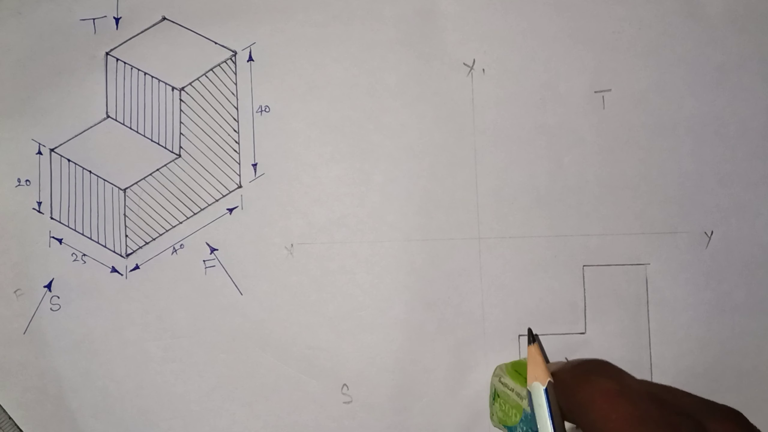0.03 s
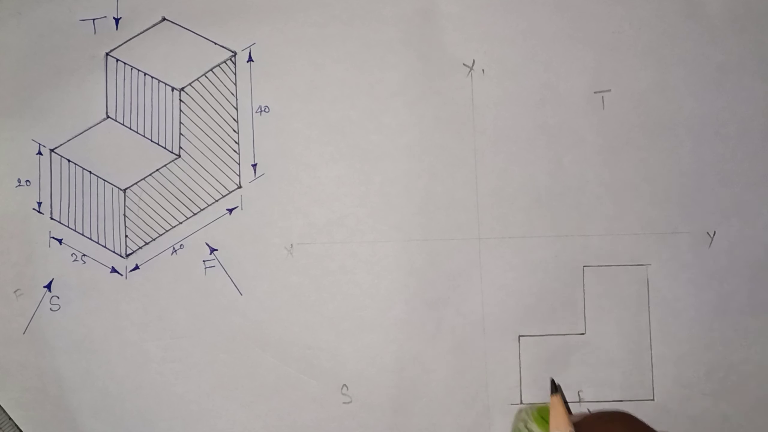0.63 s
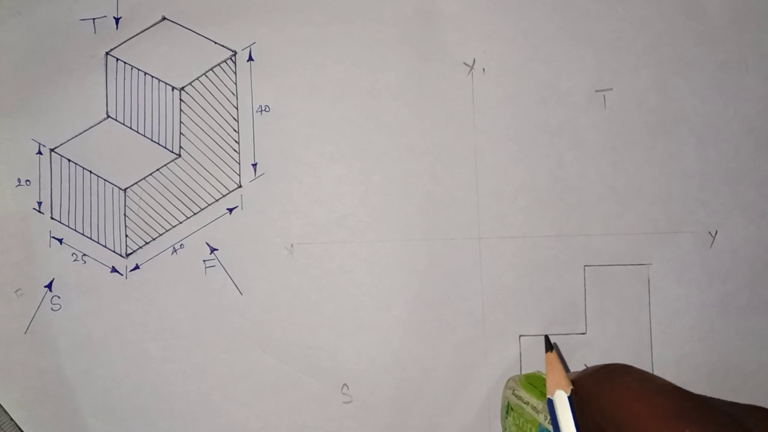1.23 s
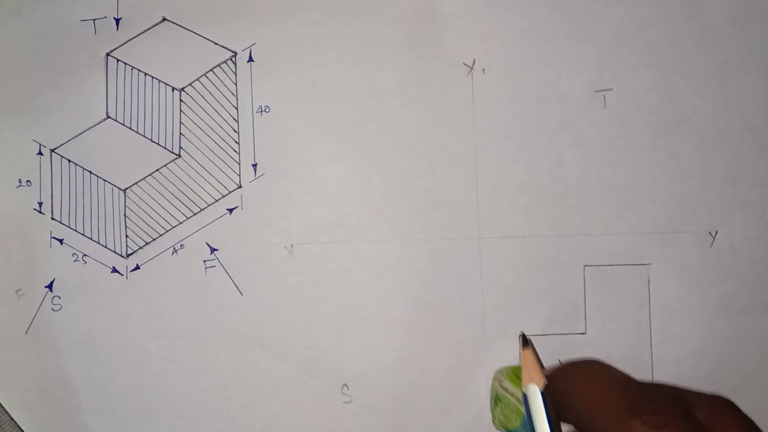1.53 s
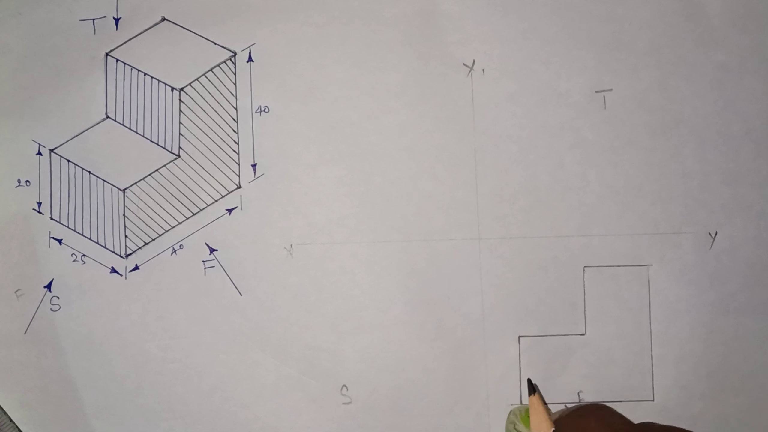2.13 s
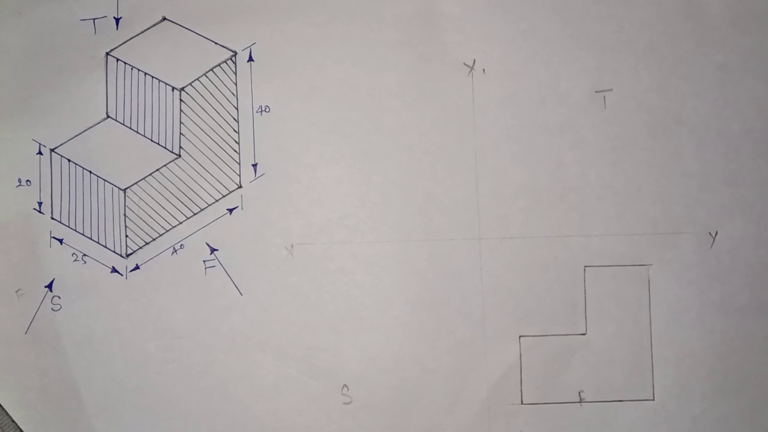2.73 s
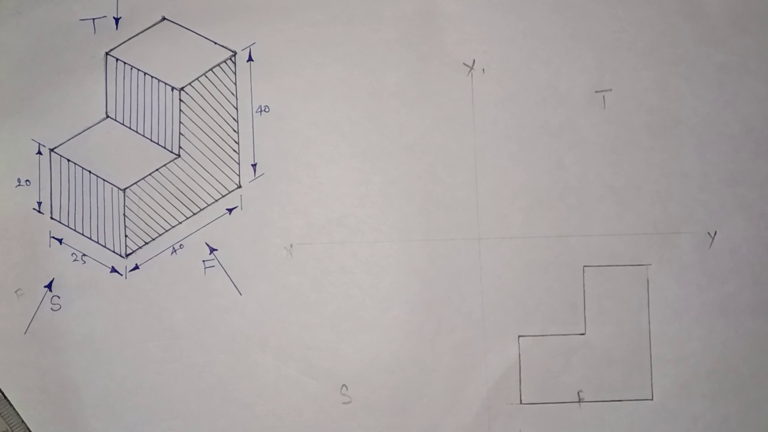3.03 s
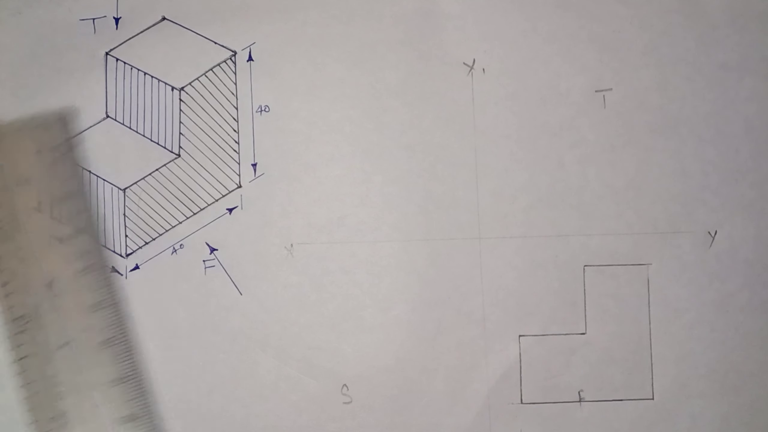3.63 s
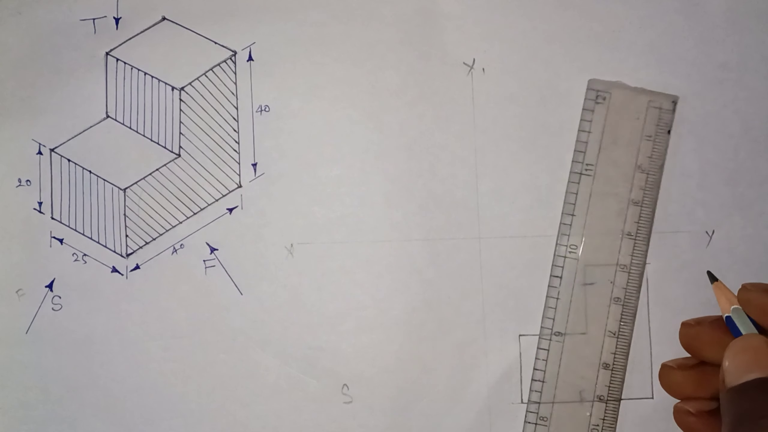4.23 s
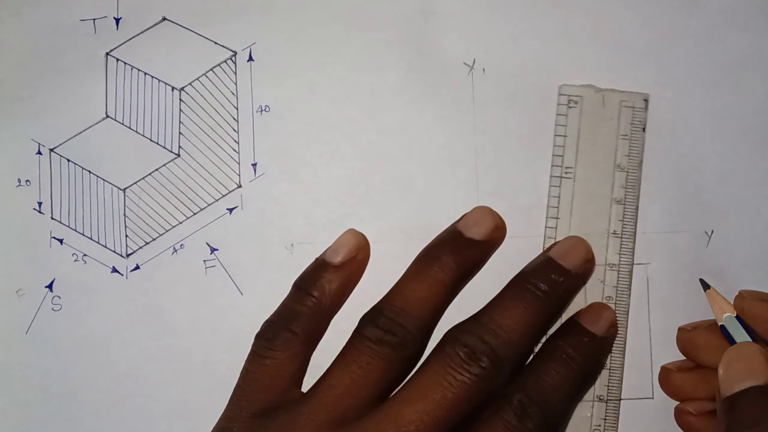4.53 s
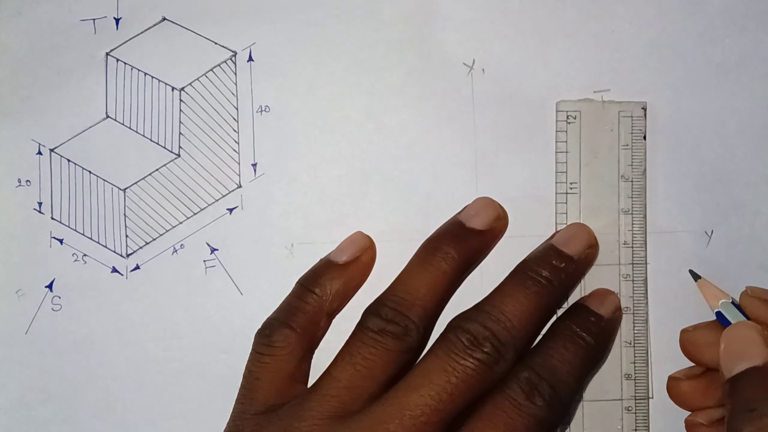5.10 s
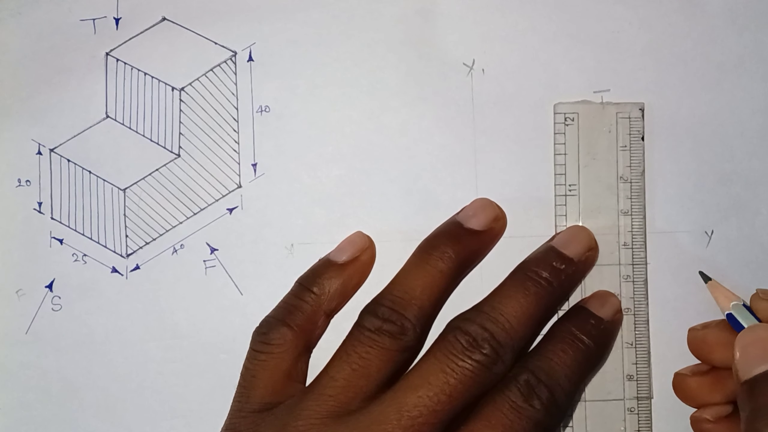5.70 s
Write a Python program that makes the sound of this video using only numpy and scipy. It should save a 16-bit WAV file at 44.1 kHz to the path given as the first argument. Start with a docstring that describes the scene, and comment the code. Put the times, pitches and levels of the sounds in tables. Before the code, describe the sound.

Close to the microphone in a quiet room, faint quick eraser strokes on a paper sheet end in one firm, grainy rub. Scattered taps and dull desk knocks follow as a hand slides and drags across the paper. Then a plastic ruler scrapes briefly and lands in a rattling clatter, the loudest sound, before fingers press it down and shift it with faint, dull rubs.

```python
"""Eraser and ruler on a drawing sheet.

Close up, in a quiet room, a hand holding pencil and eraser wipes lightly to and fro, rubs hard once,
shifts on the paper and taps the desk. A ruler is picked up, dropped flat with a clatter, pressed down
and nudged into place. Rubs are tiny slips on paper fibres; blows ring the modes of ruler and desk."""
import sys
import numpy as np
from scipy import signal
from scipy.fft import rfft, irfft, next_fast_len
from scipy.io import wavfile
from scipy.ndimage import uniform_filter1d, map_coordinates

SR = 44100
rng = np.random.default_rng(int(sys.argv[2]) if len(sys.argv) > 2 else 0)


def inscribe(sig):
    """Save sig as 16-bit PCM at rate SR to the path in sys.argv[1].

    A 1-D sig is mono; a 2-D sig holds one channel per row.
    Samples are clipped to [-1, 1] before scaling.
    """
    pcm = np.round(np.clip(np.atleast_2d(sig).T, -1, 1) * 32767)
    wavfile.write(sys.argv[1], SR, pcm.astype(np.int16))


N = 254016
TIME = np.arange(N) / SR
AGE = TIME[:SR * 3 // 4]  # seconds since a blow


def amp(db):
    """Decibels to gain."""
    return 10 ** (np.asarray(db) / 20)


def unit(x):
    """Scale to rms 1."""
    return x / np.sqrt(np.mean(x ** 2) + 1e-20)


def white(like):
    """White noise of the same length."""
    return rng.standard_normal(len(like))


def along(points, hz):
    """Read (Hz, value) points on a log axis."""
    point_hz, values = np.transpose(points)
    return np.interp(np.log(hz + 1), np.log(point_hz + 1), values)


def filtered(x, response):
    """Apply a frequency response."""
    size = next_fast_len(len(x) + SR // 4)
    return irfft(rfft(x, size) * response(np.fft.rfftfreq(size, 1 / SR)), size)[:len(x)]


def coloured(x, spectrum):
    """Shape x by a spectrum, to rms 1."""
    return unit(filtered(x, lambda hz: amp(along(spectrum, hz))))


def resonant(x, peaks):
    """Pass x through parallel resonances, to rms 1."""
    def response(f):
        return sum(amp(db) * 1j * f * width_hz / (hz * hz - f * f + 1j * f * width_hz)
                   for hz, width_hz, db in peaks)
    return unit(filtered(x, response))


def add(track, start_s, sound):
    """Mix a sound into the track."""
    part = track[round(start_s * SR):][:len(sound)]
    part += sound[:len(part)]


def fade(t60_s, attack_s):
    """Envelope of a blow."""
    return amp(-60 * AGE / t60_s) * (1 - np.exp(-AGE / attack_s))


def stroke(start_s, length_s, rise_s=0.011, t60_s=0.3):
    """Envelope of a stroke: rise, hold, decay."""
    rise = np.clip((TIME - start_s) / rise_s, 0, 1)
    return rise * amp(-60 * np.maximum(TIME - start_s - length_s, 0) / t60_s)


def contact_time(hardness, soft_s, hard_s):
    """Harder contact, shorter attack."""
    return soft_s * (hard_s / soft_s) ** hardness


def fibres(slips_per_s, spread_db):
    """Friction: tiny slips of uneven size on the paper's fibres."""
    slips = rng.random(N) < slips_per_s / SR
    return slips * white(TIME) * amp(spread_db * white(TIME))


def catching(depth_db, rate_hz=70):
    """Uneven gain of friction that catches and lets go."""
    knots = rng.standard_normal(4096)
    return unit(amp(depth_db * map_coordinates(knots, [TIME * rate_hz], mode="wrap")))


# Each row: frequency in Hz, relative level in dB.
ROOM_SPECTRUM = [(15, -54.5), (25, -21.5), (44, -13.5), (64, -9.5), (101, 0.5), (188, -5), (410, -14.5),
                 (762, -17.5), (1110, -18), (1570, -20), (2360, -25), (3340, -38.5), (15500, -36.5)]


def room_noise(level_db=-70):
    """The room's steady, low background."""
    return amp(level_db) * coloured(white(TIME), ROOM_SPECTRUM)


# Each row: frequency in Hz, reverberation time in seconds.
ROOM_T60 = [(150, 0.9), (1500, 0.32), (12000, 0.043)]


def room_echo(x, level_db=-23):
    """A small room's tail, dying faster in the treble."""
    hz, seconds, bins = signal.stft(white(AGE), SR, nperseg=256)
    decay = amp(-60 * seconds / along(ROOM_T60, hz)[:, None])
    _, tail = signal.istft(bins * decay, SR, nperseg=256)
    delayed = np.pad(x, (SR // 200, 0))
    return amp(level_db) * signal.fftconvolve(delayed, tail / np.linalg.norm(tail))[:N]


# Paper under firm and light contact. Each row: frequency in Hz, relative level in dB.
SCRAPE_SPECTRUM = [(50, -19), (120, -4), (250, -4), (400, -2.5), (800, -1), (1500, -6), (2800, -6),
                   (3800, -15.5), (5500, -23), (9000, -50)]
HISS_SPECTRUM = [(1500, -11), (3500, -7.5), (6000, -9.5), (9000, 0.5), (12000, -12.5), (15500, -14)]
# Low desk modes. Each row: frequency in Hz, width in Hz, relative level in dB.
RUMBLE_MODES = [(56.4, 30, -2), (88, 29, -3.5), (126, 23, -6.5), (190, 60, -8), (290, 77, -16)]


def resting_hand(scrape_db=-69, hiss_db=-81, rumble_db=-66):
    """The hand lying on the sheet rustles and rumbles faintly; levels are for full contact."""
    contact = np.interp(TIME, [0, 1.1, 3.6, 3.85], [0.39, 1, 1, 0.45])
    scrape = amp(scrape_db) * coloured(fibres(2500, spread_db=1), SCRAPE_SPECTRUM)
    hiss = amp(hiss_db) * coloured(fibres(6000, spread_db=3), HISS_SPECTRUM)
    rustle = (scrape + hiss) * catching(depth_db=0.84, rate_hz=75)
    rumble = amp(rumble_db) * resonant(white(TIME), RUMBLE_MODES)
    return contact * (rustle + rumble)


# Each row: start in seconds, length in seconds, level in dB.
FINGER_RUBS = [(4.209, 0.023, -53), (4.762, 0.16, -65.5), (4.975, 0.236, -66.5), (5.651, 0.074, -68)]
# Each row: frequency in Hz, relative level in dB.
SKIN_SPECTRUM = [(60, -19.5), (130, -4.5), (250, 0), (350, -9.5), (580, -5), (800, -12), (2800, -23),
                 (5000, -50.5)]


def fingers():
    """Skin creeps over ruler and sheet in soft, dull slips."""
    envelope = sum(amp(db) * stroke(start_s, length_s) for start_s, length_s, db in FINGER_RUBS)
    slips = coloured(fibres(2400, spread_db=2.3), SKIN_SPECTRUM)
    return envelope * slips * catching(depth_db=1.25, rate_hz=40)


def desk_loads(push_db=-49.5, ruler_db=-4.5, deep_slap_hz=302, db_per_octave=-9.5):
    """Start in seconds and boom in dB of each tap, push and ruler blow; deeper slaps boom more."""
    loads = [(start_s, boom_db) for start_s, *_, boom_db in TAPS]
    loads += [(start_s, push_db) for start_s, _, direction in wipes() if direction > 0]
    loads += [(start_s, db + ruler_db + db_per_octave * np.log2(slap_hz / deep_slap_hz))
              for start_s, db, _, slap_hz in RULER_HITS]
    return loads


BOOM_HZ = 90
HAND_RESTS_S = [1.05, 3.23, 3.631, 4.62]


def desk_boom(light_t60_s=0.39, light_db=-45, ring_growth_per_db=0.02, thud_db=-5, rest_t60_s=0.14):
    """The desk top booms and thuds; heavier loads ring longer; the settling hand stills it."""
    out = np.zeros(N)
    for start_s, db in desk_loads():
        t60_s = light_t60_s * np.exp(ring_growth_per_db * max(db - light_db, 0))
        boom = np.sin(2 * np.pi * BOOM_HZ * AGE) * fade(t60_s, attack_s=0.012)
        thud = amp(thud_db) * resonant(white(AGE), RUMBLE_MODES) * fade(t60_s / 2, attack_s=0.0049)
        free_s = min([rest_s - start_s for rest_s in HAND_RESTS_S if rest_s > start_s], default=1)
        stilled = amp(-60 * np.maximum(AGE - free_s, 0) / rest_t60_s)
        add(out, start_s, amp(db) * (boom + thud) * stilled)
    return out


def desk_shudder(level_db=-27.5, judder_db=-15):
    """The desk shudders under the dragging hand."""
    drag = stroke(start_s=3.458, length_s=0.077, rise_s=0.025, t60_s=0.25)
    boom = unit(np.sin(2 * np.pi * BOOM_HZ * TIME))
    judder = amp(judder_db) * resonant(white(TIME), RUMBLE_MODES)
    return amp(level_db) * drag * (boom + judder)


def wipes(count=7, first_s=0.004, period_s=0.126, fade_db_per_s=-10.5, scatter_db=1.5):
    """Eraser wipes, growing lighter: start in seconds, relative dB, direction (1 push, -1 pull)."""
    for k in range(count):
        db = fade_db_per_s * k * period_s + scatter_db * rng.standard_normal()
        yield first_s + k * period_s, db, 1 if k % 2 else -1


def short_strokes(wipe_s=0.033, wipe_db=(-65, -68), push_db=1.5, skid_s=0.05, skid_db=(-66, -77.5)):
    """(Scrape, hiss) envelopes of wipes and skidding taps; a push scrapes more and hisses less."""
    moves = []
    for start_s, db, direction in wipes():
        gains = amp(wipe_db) * amp([db + direction * push_db, db - direction * push_db])
        moves.append(np.outer(gains, stroke(start_s, wipe_s)))
    return moves + [np.outer(amp(skid_db), stroke(start_s, skid_s)) for start_s, *_ in TAPS]


# Long rubs. Each row: time in seconds, scrape in dB, hiss in dB, both before the trim.
ERASER_RUB = [(.865, -69, -76.5), (.892, -49.5, -53), (.92, -34.5, -35), (.955, -42, -57.5),
              (.975, -33.5, -44), (.995, -33, -24.5), (1.015, -40.5, -43), (1.04, -43, -49),
              (1.09, -85, -79)]
HAND_SLIDE = [(2.47, -87, -77), (2.55, -68, -60.5), (2.64, -85, -86), (2.8, -58.5, -66), (3, -56, -66),
              (3.08, -53, -54.5), (3.19, -57, -72), (3.26, -52, -64.5), (3.441, -60, -78.5)]
HAND_DRAG = [(3.444, -56, -71), (3.475, -48, -42), (3.51, -60, -38), (3.555, -46.5, -53.5),
             (3.629, -46, -56), (3.65, -60.5, -58)]
RULER_NUDGE = [(4.564, -40, -55), (4.602, -40.5, -47.5), (4.655, -58, -64), (4.7, -58, -60),
               (4.76, -64, -69.5), (4.88, -66, -81), (4.935, -68.5, -70), (4.97, -69, -80)]


def rubs(trim_db=-1, rumble_db=-12):
    """Rubbing on the sheet: pressure gives a grainy scrape and a rumble, light quick contact a hiss."""
    moves = short_strokes()
    for rub in (ERASER_RUB, HAND_SLIDE, HAND_DRAG, RULER_NUDGE):
        times_s, *levels_db = np.transpose(rub)
        moves.append(amp([np.interp(TIME, times_s, db, left=-np.inf, right=-np.inf) for db in levels_db]))
    scrape_gain, hiss_gain = np.sqrt(sum(move ** 2 for move in moves))
    scrape = coloured(fibres(7000, spread_db=2), SCRAPE_SPECTRUM)
    hiss = coloured(fibres(20000, spread_db=1.5), HISS_SPECTRUM)
    rumble = amp(rumble_db) * resonant(white(TIME), RUMBLE_MODES)
    light = hiss_gain * hiss * catching(depth_db=1.7, rate_hz=110)
    pressed = scrape_gain * (scrape + rumble) * catching(depth_db=0.67)
    return amp(trim_db) * (pressed + light)


# Each row: start in seconds, level in dB, hardness (0 fingertip, 1 pencil point), knock pitch in Hz,
# desk boom in dB.
TAPS = [(.895, -27, 0.86, 800, -62), (.898, -26, 0.35, 900, -37), (0.9495, -28.5, 0.19, 800, -55),
        (0.9547, -20.5, 0.36, 800, -53), (1.012, -34, 0.35, 300, -37.5), (1.2029, -51, 0.73, 720, -69),
        (1.205, -45.5, 0.13, 720, -53.5), (1.405, -48, 0.1, 750, -46.5), (1.748, -62, .1, 400, -49),
        (2.012, -46, 0.16, 370, -47.5), (2.09, -65, 0, 350, -51.5), (2.264, -51.5, .2, 444, -63),
        (2.36, -68, 0.43, 400, -58), (2.486, -60, 0, 400, -58), (2.548, -51.5, 0.18, 790, -60),
        (2.9585, -30, 0, 328, -36), (3.0344, -34, 0.97, 600, -45), (3.0826, -30, 0, 355, -47),
        (3.128, -39.5, 0, 338, -38.5), (3.455, -42, 0.13, 690, -43)]
# Each row: frequency in Hz, relative level in dB, relative ring time.
KNOCK_MODES = [(162, 3.5, 0.6), (250.6, -3.5, 2.42), (317, -7, 1.1), (440, -26, 0.2), (485, -9.5, 1.2),
               (659, -5, 1.4), (773, 4, 0.46), (926, -2, 1)]
# Each row: frequency in Hz, relative level in dB.
CLACK_SPECTRUM = [(700, -38), (1150, 0), (1600, -1), (2300, -0.5), (3000, -3), (3600, -15), (6000, -49.5)]


def taps(tick_t60_s=0.027, clack_t60_s=0.046, knock_t60_s=0.052, select_db=36.5, reach_octaves=0.97):
    """Hand, eraser and pencil land, damped by the paper; hardness favours knock, clack or tick."""
    out = np.zeros(N)
    for start_s, level_db, hardness, pitch_hz, _ in TAPS:
        attack_s = contact_time(hardness, soft_s=0.0011, hard_s=0.00008)
        share_db = -select_db * np.abs(hardness - np.array([0, 0.5, 1]))
        knock_db, clack_db, tick_db = level_db + share_db - share_db.max()
        tick = amp(tick_db) * coloured(white(AGE), HISS_SPECTRUM) * fade(tick_t60_s, attack_s)
        clack = amp(clack_db) * coloured(white(AGE), CLACK_SPECTRUM) * fade(clack_t60_s, attack_s)
        add(out, start_s, tick + clack)
        for hz, db, life in KNOCK_MODES:
            reach = np.exp(-0.5 * (np.log2(hz / pitch_hz) / reach_octaves) ** 2)
            mode = np.sin(2 * np.pi * (hz * AGE + rng.random())) * fade(knock_t60_s * life, attack_s)
            add(out, start_s, amp(knock_db + db) * reach * mode)
    return out


# Each row: start in seconds, length in seconds, hiss in dB, singing in dB, pitch in Hz, width in Hz.
EDGE_SLIDES = [(3.659, .02, -70, -57, 4530, 40), (3.704, .02, -45.5, -42, 4500, 45.3),
               (4.097, 0.1, -61.5, -62.5, 4720, 300), (4.2, .035, -61, -58.5, 4850, 500),
               (4.45, 0.073, -53, -46.5, 4715, 170)]


def ruler_slides(upper_hz=11000, upper_width_hz=220, upper_db=-4.5):
    """The ruler's edge hisses on the paper and sings at two resonances; the grip sets the lower one."""
    out = np.zeros(N)
    hiss = coloured(fibres(13000, spread_db=3.3), HISS_SPECTRUM)
    for start_s, length_s, hiss_db, sing_db, hz, width_hz in EDGE_SLIDES:
        sing = resonant(white(TIME), [(hz, width_hz, 0), (upper_hz, upper_width_hz, upper_db)])
        envelope = stroke(start_s, length_s, rise_s=0.016, t60_s=0.065)
        out += envelope * (amp(hiss_db) * hiss + amp(sing_db) * sing)
    return out * catching(depth_db=2.7, rate_hz=120)


# Each row: frequency in Hz, relative level in dB.
RULER_MODES = [(168, 1.5), (255, 1), (328, -3), (400, -4.5), (565, -5), (655, -10), (729, -2), (824, 0),
               (961, -2), (1028, 2.5), (1467, -1), (1525, -2), (1641, -4.5), (1724, -1.5), (1797, -1.5),
               (2035, -3), (2150, -3.5), (2400, -7), (2772, -8), (3090, 2.5), (4336, -3.5), (4620, 3.5),
               (4720, 0), (4945, -2.5), (6684, 5.5), (7045, -1.5), (9118, 0), (9653, -2), (11040, -4),
               (11638, 1), (12493, -3)]


def ruler_body(grid_hz, base_width_hz=12, loss=0.0025, bed_db=-10.5, ripple_db=8):
    """Spectrum of strong modes, broadened by buzzing on the paper, over an uneven bed of weak ones."""
    power = sum(amp(db) ** 2 / (1 + (2 * (grid_hz - hz) / (base_width_hz + loss * hz)) ** 2) ** 2
                for hz, db in RULER_MODES)
    ripple = np.tanh(unit(uniform_filter1d(white(grid_hz), size=45)))
    bed = amp(bed_db) * unit(amp(ripple_db * ripple))
    return np.sqrt(power + bed ** 2)


# Each row: start in seconds, clack in dB, hardness (0 flat face, 1 bare edge), slap pitch in Hz.
RULER_HITS = [(3.592, -34, 0.88, 465), (4.251, -43.5, .45, 700), (4.2582, -19, 0.8, 950),
              (4.2641, -22.5, 0.89, 795.5), (4.2775, -26, 0.38, 400), (4.3064, -18.5, 0, 590),
              (4.321, -27, 0.12, 450), (4.331, -27, 0.37, 556), (4.405, -22.5, 0.5, 907),
              (4.412, -18, .42, 998), (4.418, -19.5, .58, 950), (4.4324, -26, .6, 796),
              (4.4445, -13.5, 0.52, 890), (4.4524, -23.5, .42, 298.5), (4.539, -35, 0.6, 500),
              (4.5581, -28, 0.58, 195), (4.564, -27, 0.43, 450)]
# Ring in the hand, on end, lying flat, under the fingers. Each row: time in seconds, T60 in seconds.
RULER_T60 = [(3.6, 0.034), (4.255, 0.83), (4.305, 0.27), (4.45, 0.28), (4.55, .1)]
# Flat and edge landings. Each row: frequency in Hz, relative level in dB.
SLAP_SPECTRUM = [(60, -19.5), (150, 2), (300, -3.5), (430, -7.5), (600, -6.5), (1000, -4.5), (1250, -17),
                 (3000, -45)]
CRACK_SPECTRUM = [(2000, -37), (3600, -4.5), (4700, 0.5), (5600, -3), (8000, -1.5), (11700, -1.5),
                  (13500, -4), (15500, -9)]


def ruler_clatter(chatter_t60_s=0.039, ring_db=-8, treble_life=0.65, reach_octaves=0.55,
                  press_s=4.46, held_t60_s=1.0):
    """Each contact chatters along the ruler, which rings on, damped further once the fingers press."""
    out = np.zeros(N)
    grid_hz = np.fft.rfftfreq(len(AGE), 1 / SR)
    body = ruler_body(grid_hz)
    low, middle, high = [body * amp(along(spectrum, grid_hz))
                         for spectrum in (SLAP_SPECTRUM, CLACK_SPECTRUM, CRACK_SPECTRUM)]
    for start_s, clack_db, hardness, slap_hz in RULER_HITS:
        slap_db = clack_db - 4 + 12.5 * (1 - hardness) ** 2  # the face drives the low modes
        crack_db = clack_db - 22 + 34 * hardness  # the edge drives the high ones
        slap = low / (1 + (np.log2((grid_hz + 1) / slap_hz) / reach_octaves) ** 2)
        chatter = fade(chatter_t60_s, contact_time(hardness, soft_s=0.0014, hard_s=0.00018))
        ring_t60_s = np.interp(start_s, *np.transpose(RULER_T60))
        held = amp(-60 * np.maximum(AGE - max(press_s - start_s, 0), 0) / held_t60_s)
        for db, band, life in ((slap_db, slap, 1), (clack_db, middle, 1), (crack_db, high, treble_life)):
            vibration = unit(irfft(band * rfft(white(AGE)), len(AGE)))
            ring = amp(ring_db) * fade(ring_t60_s * life, attack_s=0.0036) * held
            add(out, start_s, amp(db) * vibration * (chatter + ring))
    return out


def scene():
    """Everything on the desk, its faint echo and the room's noise."""
    near = ruler_clatter() + ruler_slides() + taps() + rubs() + fingers() + resting_hand()
    return (near + room_noise() + desk_boom() + desk_shudder() + room_echo(near))[None]


def record(dry, low_cut_hz=41, top_hz=15800, edge_hz=300):
    """The small microphone loses the deepest bass; the treble ends at a band limit."""
    def response(hz):
        low_cut = hz ** 3 / np.sqrt(hz ** 6 + low_cut_hz ** 6)
        return low_cut * np.clip((top_hz - hz) / edge_hz + 0.5, 0, 1)
    return np.array([filtered(channel, response) for channel in dry])


dry = scene()
out = record(dry)
inscribe(out)
```